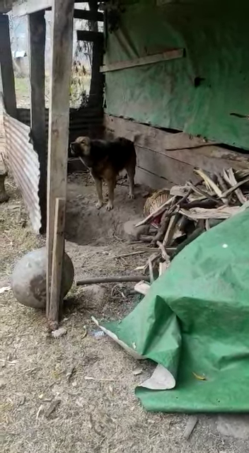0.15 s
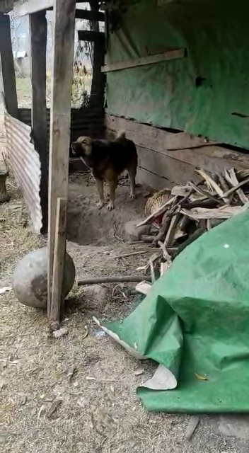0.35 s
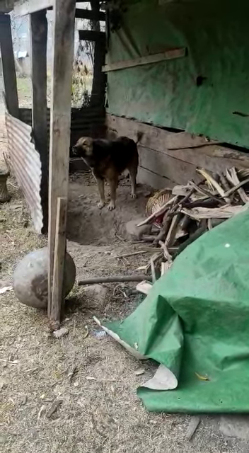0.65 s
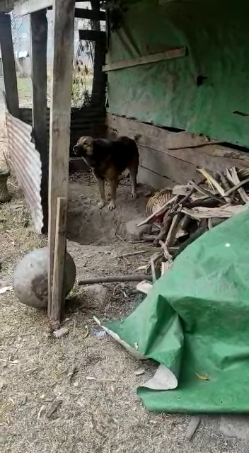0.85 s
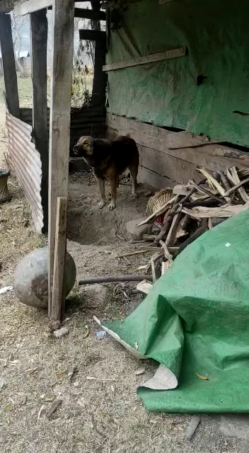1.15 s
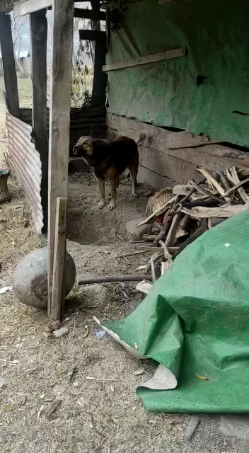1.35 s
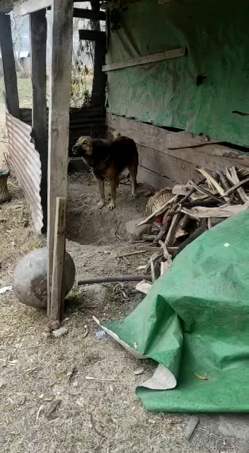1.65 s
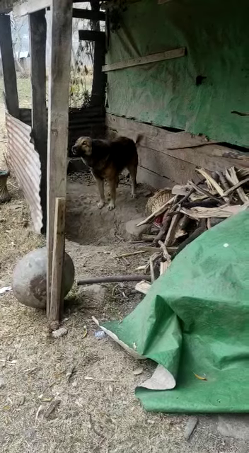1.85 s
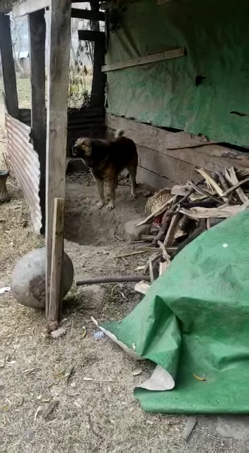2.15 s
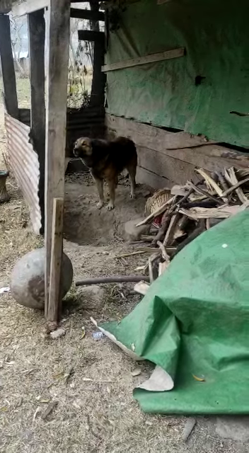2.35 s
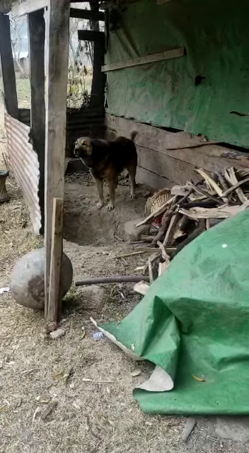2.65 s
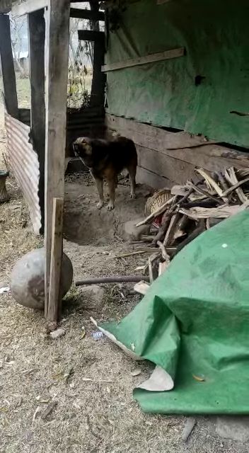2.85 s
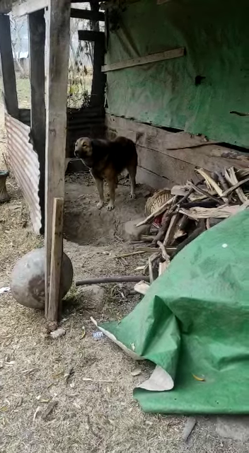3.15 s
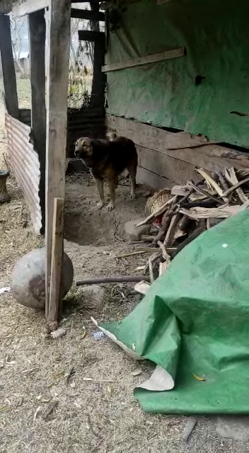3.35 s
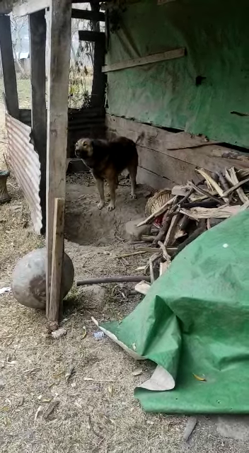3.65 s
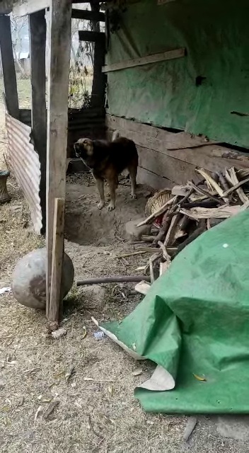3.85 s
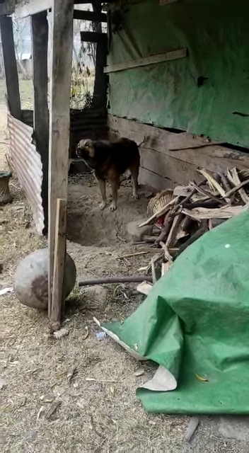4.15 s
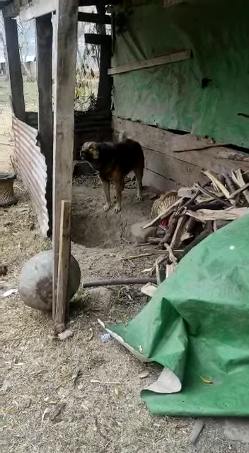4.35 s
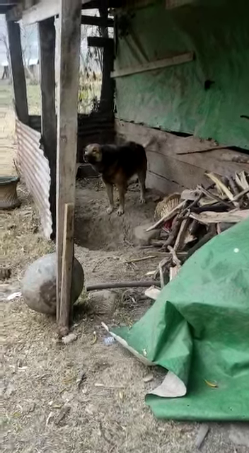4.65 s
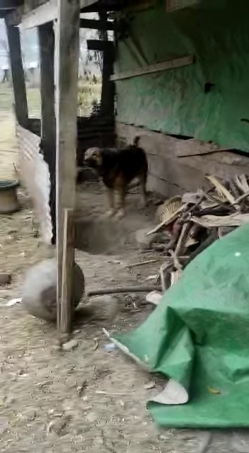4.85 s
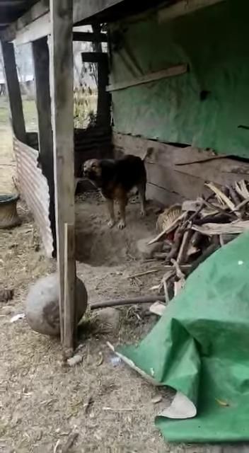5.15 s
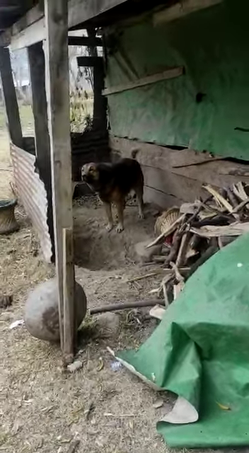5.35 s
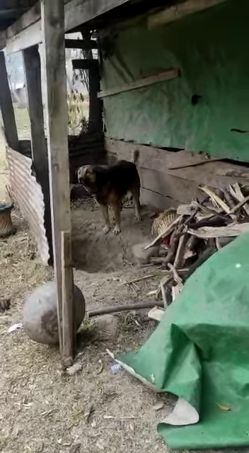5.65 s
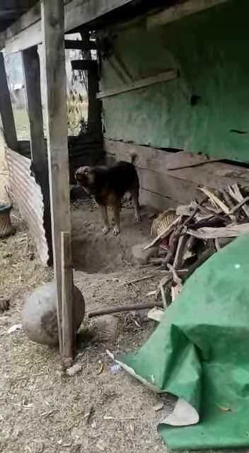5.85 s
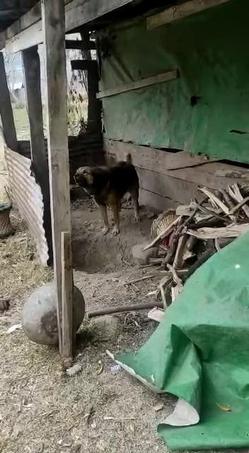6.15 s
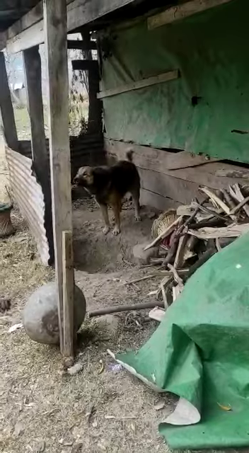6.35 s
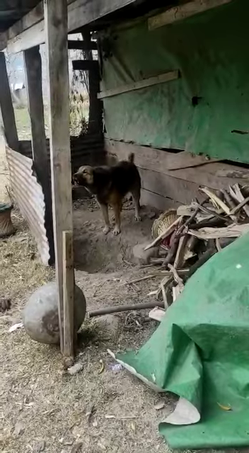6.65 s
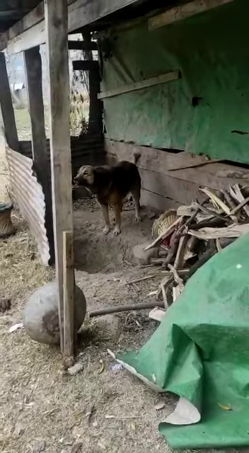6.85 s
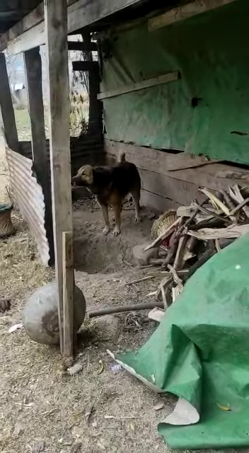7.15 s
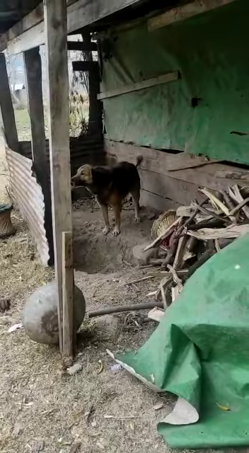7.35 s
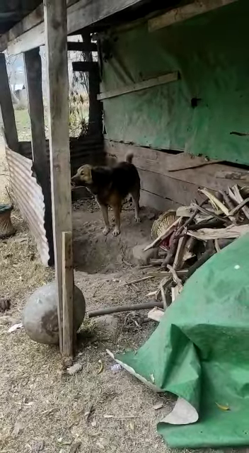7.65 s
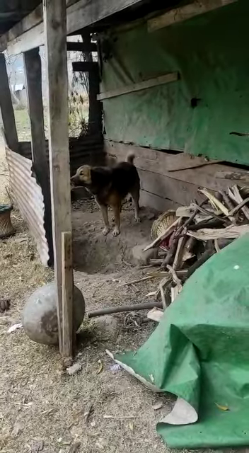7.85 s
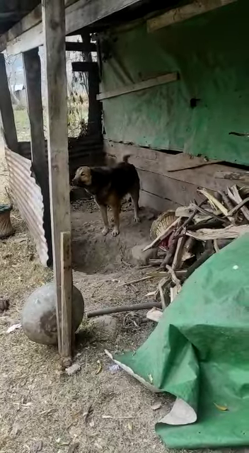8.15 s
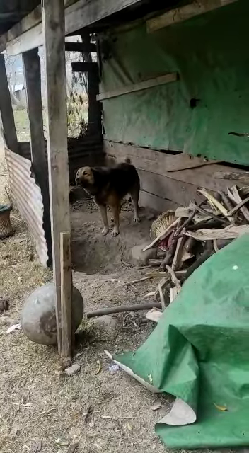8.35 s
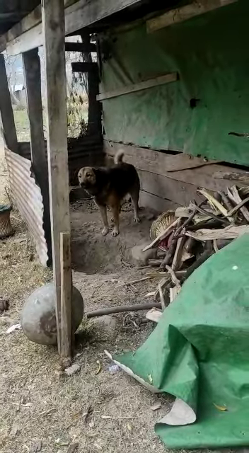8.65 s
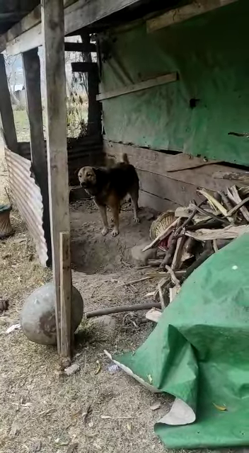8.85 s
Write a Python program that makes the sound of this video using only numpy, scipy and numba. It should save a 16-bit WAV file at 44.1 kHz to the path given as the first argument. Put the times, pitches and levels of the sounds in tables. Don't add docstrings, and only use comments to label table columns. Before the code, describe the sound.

Deep, rough barks from a big dog a few metres away, with low growls, faint fowl trills and gusts of wind outdoors.

```python
import sys
import numpy as np
from scipy import signal
from scipy.fft import rfft, irfft, next_fast_len
from scipy.io import wavfile
from scipy.ndimage import uniform_filter1d
from numba import njit

SR = 44100
rng = np.random.default_rng(int(sys.argv[2]) if len(sys.argv) > 2 else 0)


def dump(signal):
    limited = np.clip(np.atleast_2d(signal).T, -1, 1)
    pcm = np.round(limited * 32767).astype(np.int16)
    wavfile.write(sys.argv[1], SR, pcm)


def amplitude_ratio(level_db):
    exponent = np.asarray(level_db, float) / 20
    return 10 ** exponent


N = 397771
SIZE = next_fast_len(N)

# (time [s], level [dB])
FLOOR_COLOUR = [(35, -18.5), (60, -6), (136, -12.5), (309, -6.5), (527, -12), (959, -18), (2040, -24),
                (4050, -36.5), (8050, -35), (9830, -46.5), (12000, -56.5), (15600, -89), (22000, -120)]
FLOOR_LEVEL = [(0, -62), (.75, -68.5), (1.25, -70), (1.449, -70.5), (2.8, -69.5), (4.8, -68), (5.6, -71.5),
               (7.6, -72), (9, -69.5)]
# (time [s], peak level [dB])
LEAF_STIRS = [(2.55, -79), (3.03, -72), (4.95, -70.5), (5.57, -77), (6.8, -71), (8.35, -81.5), (9.0, -77)]
LEAVES_REST_DB, STIR_RISE_DB_S, STIR_FALL_DB_S = -83.5, 41, 53

# (time [s], rumble level [dB])
BREEZE = [(0, -74.5), (1.1, -66), (1.7, -72), (3.5, -77.5), (4.4, -70.5), (5.3, -68), (5.9, -57.5),
          (6.2, -62.5), (6.9, -48.5), (7.4, -52.5), (7.7, -66.5), (8.2, -50), (8.6, -71.5), (9.02, -68)]
# (time [s], peak level [dB])
GUSTS = [(.15, -66.5), (1.1, -62), (2.06, -55), (2.61, -60), (2.89, -61), (3.87, -63.5), (4.97, -64.5),
         (5.17, -58), (5.53, -54.5), (5.65, -50.5), (5.88, -40), (6.03, -47), (6.25, -48.5), (6.38, -41),
         (6.55, -45.5), (6.8, -43.5), (6.91, -39), (7.01, -39.5), (7.11, -41.5), (7.33, -46.5), (7.44, -49),
         (7.76, -57), (7.89, -57), (8.02, -44), (8.29, -51), (8.44, -58.5), (8.74, -57)]
# (frequency [Hz], density [dB per Hz])
WIND_COLOUR = [(8.8, -31.5), (15, 7), (76, -7.5), (177, -18), (249, -28), (309, -25), (339, -33.5),
               (600, -36.5), (780, -62), (1320, -120)]
GUST_RISE_DB_S, GUST_FALL_DB_S = 216, 168.5

# (time [s], pitch [Hz], level [dB])
WHISTLES = [
    [(7.55, 560, -86.5), (7.65, 550, -73.5), (7.75, 556.7, -83.5), (7.82, 625.5, -80.5), (7.9, 570, -75.5),
     (8.03, 513.6, -84.5)],
    [(8.85, 1564, -91), (8.9, 1696, -79), (8.94, 1690, -72), (8.95, 1624, -75), (9.02, 1615, -73)],
]
# (start [s], length [s], top pitch [Hz], level [dB], trill rate [Hz])
FOWL_CALLS = [(0.858, .29, 509.5, -60.5, 73), (1.519, .31, 493.7, -60, 68), (3.22, .26, 459.2, -68, 70),
              (3.784, 0.18, 500, -73, 70), (4.405, 0.27, 482, -74, 68)]
# (multiple of the pitch [-], level [dB])
FOWL_PARTIALS = [(2, -13), (4, 1), (5, -20)]
# (share of length [0-1], pitch against top [ratio], level [dB],
# trill rate against mean [ratio], third partial level [dB])
CALL_SHAPE = [(0, .87, -18, 1.02, -88), (.16, .95, -7, 1.02, -71), (.32, 1.0, -.5, 1.01, -72),
              (.55, .96, 0.1, .99, -75), (.88, .9, -6, .97, -82), (1, .87, -28, .96, -105)]

# (time [s], pulse rate [Hz], level [dB], mouth opening [dB])
GROWLS = [
    [(0.85, 75.4, -63, -1.5), (0.896, 83.47, -46, -4), (0.944, 87.6, -45, -13.5), (1.046, 67.12, -67, -15),
     (1.1, 76.6, -66, -10)],
    [(1.49, 92.47, -66.5, -19), (1.51, 90.9, -49, -5), (1.594, 95.74, -46.5, -6), (1.666, 83.2, -48.5, -13),
     (1.998, 78.76, -56, -18.5), (2.03, 79.54, -52, -13.5)],
    [(2.49, 89.8, -70, 2), (2.548, 91.5, -43, -8.5), (2.628, 80.3, -55.5, -18), (2.67, 82.8, -91.5, -4.5)],
    [(4.66, 83.75, -69, -1), (4.714, 75.4, -51.5, -20), (4.768, 73, -61.5, -17.5),
     (4.81, 70.9, -75.5, -31.5)],
]
# (frequency [Hz], width [Hz], level [dB])
CHEST = [(86.4, 30, -2.5), (199, 26, 8), (361, 70, 0.5)]
# (time [s], peak level [dB])
LIP_SMACKS = [(0.081, -53), (0.9757, -59), (2.589, -52), (5.2088, -54), (6.6154, -61)]

# (top time [s], top pitch [Hz], hoarseness on top [0-1], breath hiss [dB], half-width [s])
BARK_ARCHES = [(.19, 311, .11, -44.5, 0.077), (.532, 307.7, .4, -46, .1), (2.135, 338.8, .11, -43.5, 0.089),
               (2.95, 322, .15, -44, .08), (3.6, 331.1, .17, -39.5, 0.077), (3.97, 321.1, .14, -42, 0.088),
               (4.325, 312.5, .13, -43, 0.083), (5.065, 326.4, .16, -39, 0.076),
               (5.945, 326.1, .19, -43, .09), (6.297, 312.5, .05, -42, .084), (6.715, 320.8, .1, -43, .086),
               (7.105, 314.3, .2, -44, 0.087), (8.155, 328.9, .2, -43.5, .08),
               (8.51, 314.7, .11, -43.5, 0.073)]
# (onset [s], swell length [s], hold length [s], hold start level [dB], hold end level [dB])
BARK_EFFORTS = [(0.108, 0.065, 0.043, -18, -19.5), (0.463, .032, 0.063, -18.5, -22.5),
                (2.054, 0.053, 0.059, -15.5, -19), (2.884, 0.051, 0.043, -16, -19),
                (3.524, 0.061, 0.036, -14.5, -20.5), (3.894, 0.058, 0.036, -16, -17.5),
                (4.252, 0.063, 0.031, -13, -20), (4.995, 0.053, .046, -15.5, -22),
                (5.872, 0.042, 0.056, -17, -17), (6.225, 0.052, 0.039, -15.5, -14.5),
                (6.642, 0.058, 0.038, -14, -16.5), (7.039, 0.041, 0.049, -18, -17.5),
                (8.078, 0.052, 0.045, -16.5, -15), (8.44, 0.052, 0.035, -17.5, -17)]
# (time [s], depth [dB])
VOICE_BREAKS = [(.183, -1.5), (2.147, -8), (2.96, -3.5), (3.6, -2.5), (5.945, -9), (7.097, -3.5),
                (8.143, -9.5), (8.168, -2.5)]
# (frequency [Hz], width [Hz], level [dB])
THROAT = [(430, 98, -4), (560, 51.5, -4.5), (777, 210, -20), (940.3, 75.6, 0.12), (1004, 58, -14.5),
          (1190, 100, -12), (1313, 140, -11.5), (1343, 380, -29), (2274, 290, -24.5)]
# (frequency [Hz], width [Hz], level [dB])
RASP = [(200, 160, -13.5), (481.5, 225, 3.5), (941, 276, -1), (1180, 100, -10), (1475, 86, -10.5),
        (2327, 150, -9.5)]
# (frequency [Hz], density [dB per Hz])
BREATH_COLOUR = [(1200, -31.5), (1550, -11), (1850, -17.5), (2350, -7), (2900, -11.5), (3500, -16),
                 (4000, -14), (4600, -17), (5200, -7), (6500, -10), (8400, -15.5), (9300, -23.5),
                 (10200, -42), (15600, -41.5)]
STAGE_BREATH = (-47.5, -14, 1, -1.7, 3.1, -4, -44)
STAGE_HEAD = (4, 5.6, 5.1, 4.4, 5.6, 3.2, 6.2)
CLOSED_DB, ONSET_DB, HOARSE_DB, SHUT_DB, FADED_DB = -65.5, -32, -23, -32, -62.5
OPEN_S, SHUT_S, FADE_S = .02, .027, .078
CATCH_S = .018
ARCH_RISE, ARCH_FALL, CLEAR_SHARE = .53, .6, .41
BREAK_S = .0076

SHED_T60_S, SHED_DAMP, SHED_DB = .17, .041, -15
YARD_T60_S, YARD_DAMP, YARD_DB = .57, .15, -27.5
# (frequency [Hz], left minus right [dB])
PORT_TILT = [(100, 4), (300, 6.5), (600, 2), (950, 7), (1400, 2), (2500, -2), (5500, -6), (7000, -10.5),
             (9000, 6.5), (14000, 0)]
# (frequency [Hz], left leads by [radians])
PORT_PHASE = [(100, -0.53), (350, -0.61), (690, -0.43), (950, -1.21), (1250, -1.72), (2400, -1.1),
              (3450, -2.1), (5900, -1.8), (15000, -0.66)]
# (frequency [Hz], share of moments [0-1])
DROPOUTS = [(1700, .04), (2700, .05), (3300, .3), (4600, .38), (5200, .15), (7000, .15), (8000, .35),
            (9500, .4)]


def unit(x):
    return x / np.sqrt(np.mean(x ** 2))


def steady(x, span_s):
    return x / np.sqrt(uniform_filter1d(x ** 2, size=int(span_s * SR)) + 1e-9)


def curves(tables):
    t = np.arange(N) / SR
    s, *columns = np.vstack(tables).T
    gate = sum((t >= rows[0][0]) & (t <= rows[-1][0]) for rows in tables)
    return [np.interp(t, s, c) for c in columns] + [uniform_filter1d(1. * gate, size=200)]


def swells(rows, rest_db, rise_db_s, fall_db_s):
    t = np.arange(N) / SR
    for s, db in rows:
        slope_db_s = np.where(t < s, rise_db_s, fall_db_s)
        rest_db = np.maximum(rest_db, db - slope_db_s * abs(t - s))
    return rest_db


def walk(rate):
    k = int(SR / rate)
    held = np.repeat(rng.standard_normal(N // k + 1), k)
    return unit(uniform_filter1d(uniform_filter1d(held, k), k)[:N])


def on_log(table):
    hz, value = np.transpose(table)
    return np.interp(np.log(np.fft.rfftfreq(SIZE, 1 / SR) + 1), np.log(hz + 1), value)


def coloured(table):
    white = rfft(rng.standard_normal(SIZE))
    return unit(irfft(white * amplitude_ratio(on_log(table)), SIZE)[:N])


def resonate(x, modes):
    out = 0
    for k, (hz, width, db) in enumerate(modes):
        b, a = signal.iirpeak(hz, hz / (1.55 * width), SR)
        ring = signal.lfilter(b, a, signal.lfilter(b, a, x))
        out = out + (-1) ** k * amplitude_ratio(db) * ring
    return out


def folds(hz, rough, jitter, shimmer_db, count):
    turns = np.cumsum(hz * (1 + jitter * rough * walk(150))) / SR
    cycle = (turns + .5).astype(int)
    size = amplitude_ratio(shimmer_db * rough * rng.standard_normal(N // 40)[cycle])
    pulses = sum(np.cos(2 * np.pi * k * turns) for k in range(2, count + 1))
    swing = uniform_filter1d(size, size=60) * np.cos(2 * np.pi * turns)
    return size * pulses, swing


def field():
    shared = coloured(FLOOR_COLOUR)
    floor_db, _ = curves([FLOOR_LEVEL])
    rustle_db = swells(LEAF_STIRS, LEAVES_REST_DB, STIR_RISE_DB_S, STIR_FALL_DB_S)
    leaf_colour = [(4500, -28.5), (6000, -8.5), (8000, 1.5), (9200, -5.5), (9900, -37.5)]
    sides = []
    for _ in range(2):
        floor = amplitude_ratio(floor_db + 1.2 * walk(8.7)) * (.8 * shared + .81 * coloured(FLOOR_COLOUR))
        leaves = amplitude_ratio(rustle_db + 1.0 + 3.3 * walk(10)) * coloured(leaf_colour)
        sides.append(floor + leaves)
    return np.array(sides)


def wind():
    breeze_db, _ = curves([BREEZE])
    level_db = swells(GUSTS, breeze_db, GUST_RISE_DB_S, GUST_FALL_DB_S)
    sides = []
    for port_db in (5.5, -5):
        rumble = steady(coloured(WIND_COLOUR), span_s=.031)
        sides.append(rumble * amplitude_ratio(level_db + port_db + 4.2 * walk(22)))
    return np.array(sides)


def whistles():
    hz, level_db, gate = curves(WHISTLES)
    turns = np.cumsum(hz * (1 + .03 * walk(150))) / SR
    partner = (hz > 1000) * amplitude_ratio(.5) * np.sin(4 * np.pi * turns / 3)
    return gate * amplitude_ratio(level_db - 3.0 + 5 * walk(40)) * (np.sin(2 * np.pi * turns) + partner)


def calls():
    share, pitch, level_db, trill, third_db = np.transpose(CALL_SHAPE)
    tables = []
    for s, length_s, hz, db, rate in FOWL_CALLS:
        columns = [s + length_s * share, hz * pitch, db + level_db, rate * trill, third_db - db - level_db]
        tables.append(np.transpose(columns))
    return curves(tables)


def fowl():
    hz, level_db, trill_hz, third_db, gate = calls()
    trill = np.sin(2 * np.pi * np.cumsum(trill_hz * (1 + .033 * walk(44))) / SR)
    turns = np.cumsum(hz * (1 + .062 * trill + .011 * walk(300))) / SR
    tone = sum(amplitude_ratio(db) * np.sin(2 * np.pi * int(k) * turns) for k, db in FOWL_PARTIALS)
    tone = tone + amplitude_ratio(third_db) * np.sin(6 * np.pi * turns)
    rasp = coloured([(600, -39.5), (1500, 5.0), (2300, 2), (3300, -22.5), (4300, -15.5), (6500, -14),
                     (8000, -37.5)])
    return gate * amplitude_ratio(level_db + 2.5 + 1.8 * walk(91)) * (tone + amplitude_ratio(-14.5) * rasp)


def smacks():
    lips = np.zeros(N)
    for s, db in LIP_SMACKS:
        burst = np.exp(-np.arange(130) / 40) * rng.standard_normal(130)
        lips[int(s * SR):][:130] = amplitude_ratio(db + 3) * burst
    return resonate(lips, [(5000, 6300, -1.97)])


def growls():
    hz, level_db, mouth_db, gate = curves(GROWLS)
    pulses, swing = folds(hz, 1., jitter=.04, shimmer_db=2.0, count=12)
    air = (1 + .5 * swing) * rng.standard_normal(N)
    chest = unit(resonate(pulses + swing + 3 * air, CHEST))
    mouth_modes = [(594, 1000, -3.5), (840, 470, 3.0), (1580, 170, -9), (5020, 2000, -28)]
    mouth = unit(resonate(.5 * pulses + 4 * air, mouth_modes))
    return gate * amplitude_ratio(level_db) * (chest + amplitude_ratio(mouth_db) * mouth)


def efforts():
    tables = []
    for (onset_s, swell_s, hold_s, first_db, last_db), arch in zip(BARK_EFFORTS, BARK_ARCHES):
        hoarse_s = max(swell_s - CATCH_S, .004)
        s = onset_s + np.cumsum([-OPEN_S, OPEN_S, hoarse_s, CATCH_S, hold_s, SHUT_S, FADE_S])
        voice_db = [CLOSED_DB, ONSET_DB, HOARSE_DB, first_db, last_db, SHUT_DB, FADED_DB]
        breath_db = arch[3] + np.array(STAGE_BREATH)
        tables.append(np.transpose([s, voice_db, breath_db, STAGE_HEAD]))
    return curves(tables)


def breath_hiss(swing):
    breath = coloured(BREATH_COLOUR)
    patches = 0
    for hz in 1500 * 1.22 ** np.arange(13):
        patches = patches + amplitude_ratio(1.5 * walk(28)) * resonate(breath, [(hz, .18 * hz, 0)])
    return unit((1 + .3 * swing) * patches)


def barks():
    t = np.arange(N) / SR
    arch = np.array(BARK_ARCHES)
    nearest = np.searchsorted((arch[1:, 0] + arch[:-1, 0]) / 2, t)
    top_s, top_hz, hoarse, _, width_s = arch[nearest].T
    bend = np.where(t < top_s, ARCH_RISE, ARCH_FALL) * ((t - top_s) / width_s) ** 2
    hz = top_hz * np.exp(-1.1 * np.tanh(bend / 1.1))
    off_top = 1 - np.exp(-((t - top_s) / (CLEAR_SHARE * width_s)) ** 4)
    rough = np.clip(hoarse + .6 * off_top, 0, 1)
    voice_db, hiss_db, pan_db, gate = efforts()
    voice_db = voice_db + sum(db * np.exp(-((t - s) / BREAK_S) ** 2) for s, db in VOICE_BREAKS)
    pulses, swing = folds(hz, rough, jitter=.08, shimmer_db=2.5, count=8)
    air = 2.3 * rough * (1 + swing) * rng.standard_normal(N)
    mouth = resonate(pulses, THROAT) + resonate(air, RASP)
    slide = 1 + 4.6 * np.tanh(bend) * (t > top_s)
    chest = swing * (.24 + .15 * rough * walk(120)) * slide
    voice = amplitude_ratio(voice_db) * steady(mouth + chest, span_s=.021)
    hiss = amplitude_ratio(hiss_db + 3.5) * breath_hiss(swing)
    return gate * (voice + hiss), pan_db


@njit
def walls(x, lags, gain, damp):
    line, soft, out = np.zeros((8, 16384)), np.zeros(8), np.zeros((2, len(x)))
    for i in range(len(x)):
        total = 0.
        for k in range(8):
            soft[k] += (1 - damp) * (gain[k] * line[k, (i - lags[k]) & 16383] - soft[k])
            total += soft[k]
            out[k % 2, i] += soft[k]
        for k in range(8):
            line[k, i & 16383] = x[i] + soft[k] - total / 4
    return out


def echoes(x, lags, t60_s, damp, wet_db):
    lags = np.array(lags)
    gain = amplitude_ratio(-60 * lags / SR / t60_s)
    return amplitude_ratio(wet_db) * walls(x + 1e-18, lags, gain, float(np.clip(damp, 0, .9)))


def ports(x):
    half = amplitude_ratio(on_log(PORT_TILT) / 2) * np.exp(.5j * on_log(PORT_PHASE))
    return np.array([irfft(rfft(x, SIZE) * h, SIZE)[:N] for h in (half, 1 / half)])


def scene():
    birds = whistles() + fowl()
    bark, pan_db = barks()
    dog = bark + growls() + smacks()
    turn_db = 2.2 * (pan_db - 5) + 2.5 * walk(25)
    head = amplitude_ratio(.5 + np.array([turn_db, -turn_db]) / 2)
    direct = ports(dog) * head + ports(birds) * amplitude_ratio(7.5)
    shed = echoes(dog, [191, 277, 353, 461, 557, 673, 787, 911], SHED_T60_S, SHED_DAMP, SHED_DB)
    yard = echoes(dog + 4 * birds, [1511, 1987, 2503, 3109, 3767, 4421, 5227, 6007],
                  YARD_T60_S, YARD_DAMP, YARD_DB)
    return field() + wind() + direct + shed + yard


def torn(x):
    loud = uniform_filter1d(np.mean(x ** 2, axis=0), size=2048) > amplitude_ratio(-58)
    spectrum, hz = rfft(x, SIZE), np.fft.rfftfreq(SIZE, 1 / SR)
    out = x.copy()
    for low_hz in np.arange(1700, 9700, 215):
        share = np.interp(low_hz, *np.transpose(DROPOUTS))
        lost = np.repeat(rng.random(N // 3072 + 1) < share, 3072)[:N]
        inside = (hz >= low_hz) & (hz < low_hz + 215)
        band = irfft(spectrum * inside, SIZE)[:, :N]
        out -= band * uniform_filter1d(1. * (lost & loud), size=400)
    return out


def band_limit(x):
    return signal.sosfilt(signal.butter(12, 15700, fs=SR, output="sos"), x)


def record(dry):
    rounded = np.tanh(1.155 * dry) / 1.203
    mix = torn(rounded)
    return band_limit(mix)


dry = scene()
out = record(dry)
dump(out)
```